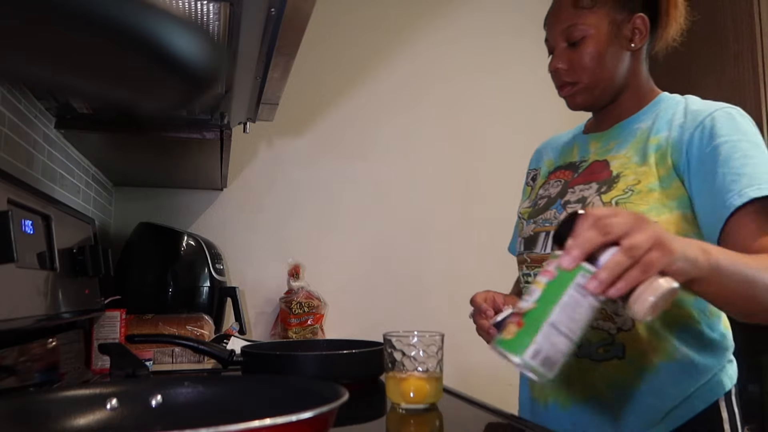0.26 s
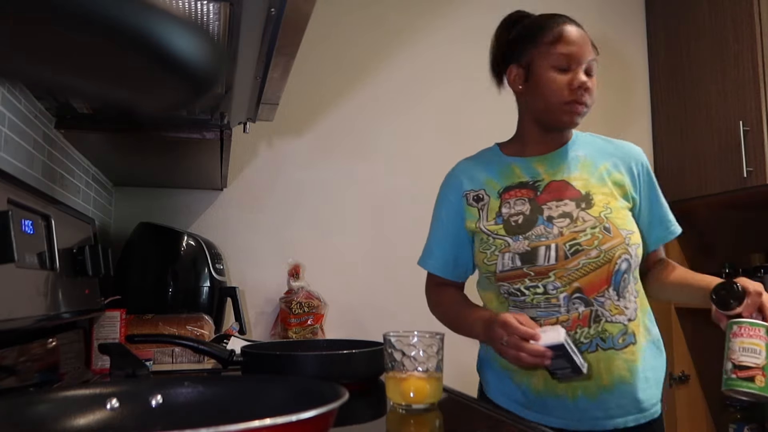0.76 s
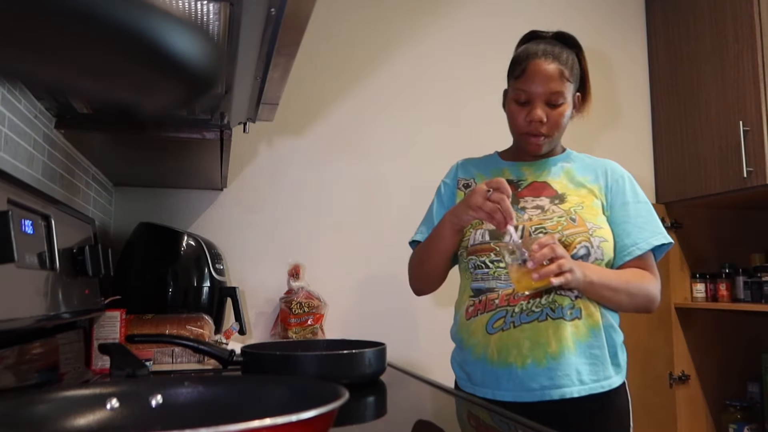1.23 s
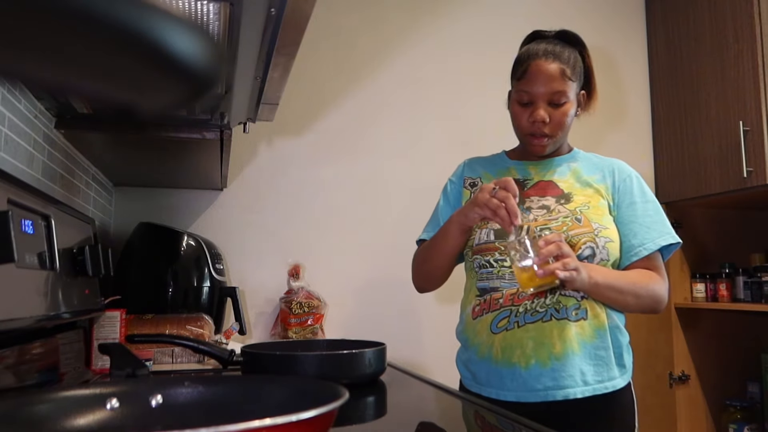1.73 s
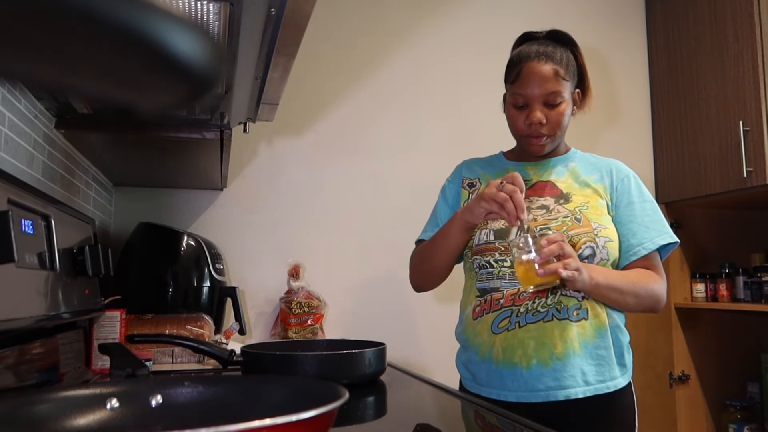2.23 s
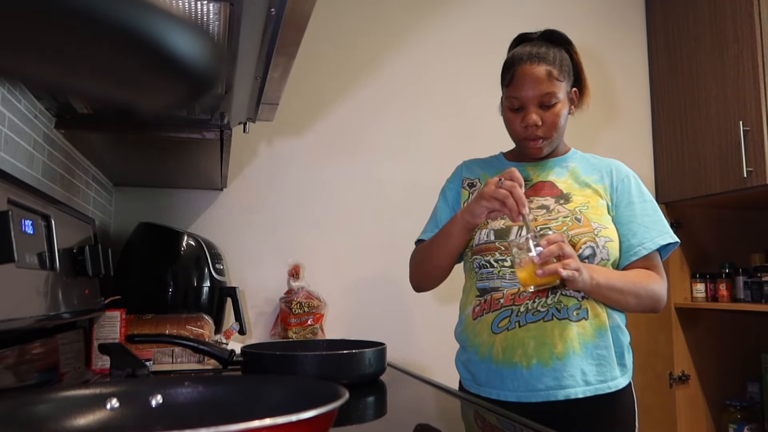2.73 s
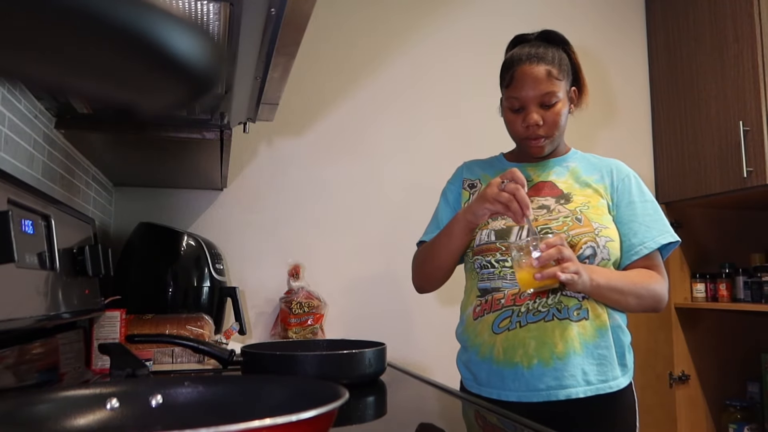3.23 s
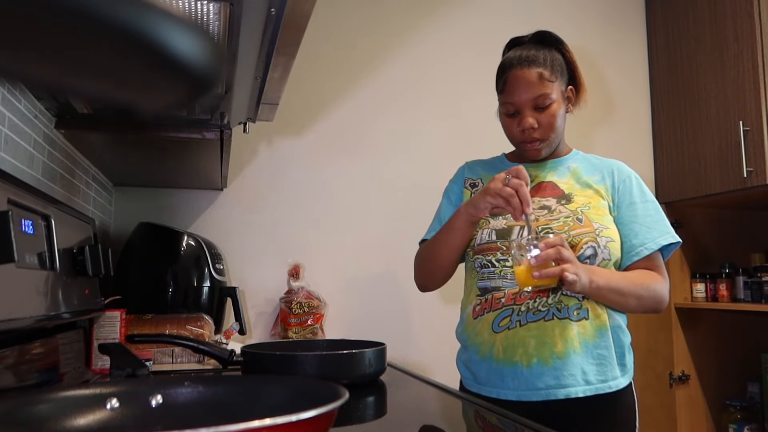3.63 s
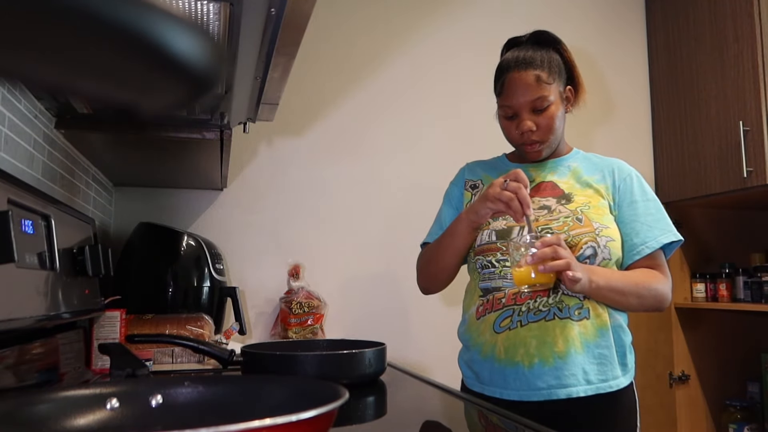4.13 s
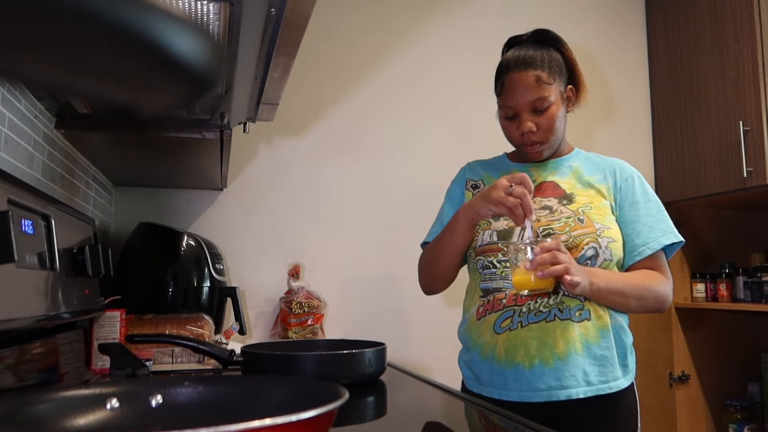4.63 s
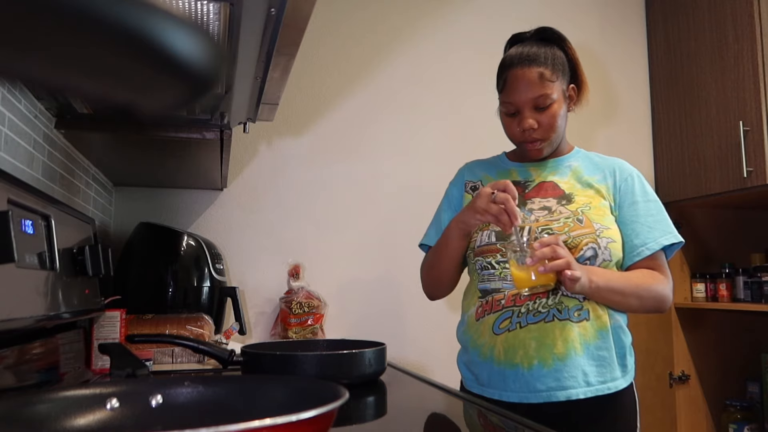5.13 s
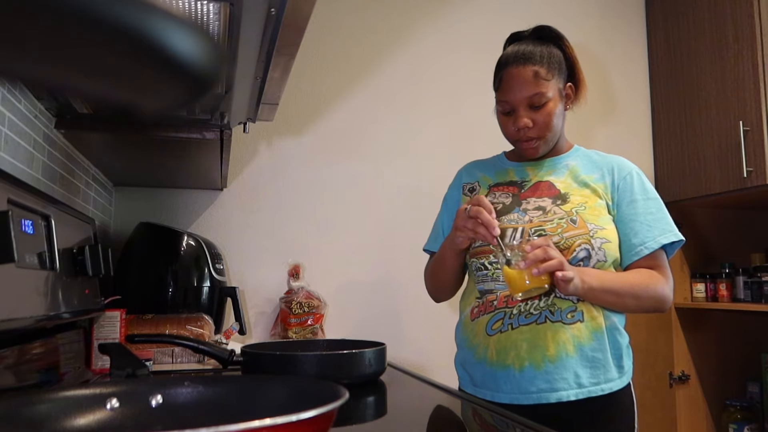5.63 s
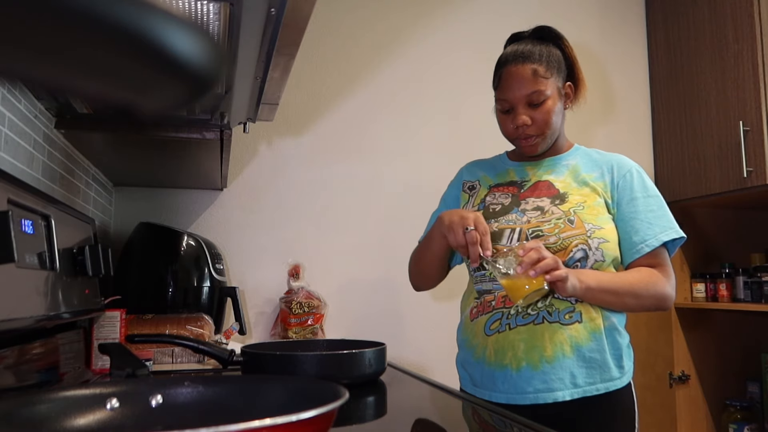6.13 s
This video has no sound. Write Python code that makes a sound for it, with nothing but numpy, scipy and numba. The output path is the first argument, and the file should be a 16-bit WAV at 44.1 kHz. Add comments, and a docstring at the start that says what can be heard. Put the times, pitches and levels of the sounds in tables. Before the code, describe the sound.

After a quiet second of fan hum and faint sizzling, a metal fork rapidly beats eggs in a drinking glass, clinking sharply in a small kitchen.

```python
"""In a small hard kitchen a fork beats eggs in a hand-held drinking glass, beside a sizzling pan and a fan.
The fan is a low hum, whose level dips at times, with filtered noise; the fat is random clicks over hiss.
Noise drives a spice jar's air resonances at the start; later a sudden waveform step is heard as a dull click.
Then the strokes excite damped modes of the glass, over grazing and swishing noise and slops of decaying sines.
All but fan and pan echo in a feedback delay network; a gain control ducks the whole mix after loud clinks."""
import sys
import numpy as np
from scipy import signal
from scipy.fft import rfft, irfft, next_fast_len
from scipy.io import wavfile
from scipy.ndimage import uniform_filter1d
from numba import njit

SR = 44100
rng = np.random.default_rng(int(sys.argv[2]) if len(sys.argv) > 2 else 0)


def wrap_up_sound(samples):
    """Save the sound to the file named by the first command line argument, as 16-bit audio."""
    columns = np.atleast_2d(samples).T
    # keep every value between -1 and 1, then stretch to whole-number steps
    tamed = np.clip(columns, -1, 1)
    steps = np.round(tamed * 32767).astype(np.int16)
    wavfile.write(sys.argv[1], SR, steps)


def how_loud(loudness_db):
    """Turn decibels into a plain amplitude multiplier (0 dB gives 1, 20 dB gives 10)."""
    steps = np.asarray(loudness_db, float) / 20
    return 10 ** steps


N = 280909
T = np.arange(N) / SR
M = next_fast_len(N)  # transform length
F = np.fft.rfftfreq(M, 1 / SR)

# damped modes of the hand-held glass: ring number (0 low, 1 second, 2 third, 3 top), f/Hz, level/dB, t60/s
GLASS_MODES = [(0, 1496, -9, 0.017), (0, 1780, -7, 0.038), (0, 1809, -0.4, 0.062), (0, 1872, -2, 0.04),
               (0, 2037, -10, 0.032), (0, 2358, -6.5, 0.023), (1, 2923, 1.5, 0.031), (1, 3057, 2.5, 0.031),
               (1, 3293, 2, 0.044), (1, 3436, -10.5, 0.062), (2, 4330, -11.5, 0.037), (2, 4576, -5, 0.053),
               (2, 4645, -4, 0.06), (2, 4756, -3.5, 0.041), (2, 5556, -8, 0.039), (3, 8250, -8.5, 0.04),
               (3, 8550, -7.5, 0.027), (3, 7200, -25, 0.026)]


def level(x, db):
    """Root-mean-square normalisation: scale a signal to a given rms level."""
    return x * how_loud(db) / np.sqrt(np.mean(x ** 2))


def colour(x, points):
    """Spectral shaping: filter by a (f/Hz, level/dB) outline, interpolated over log frequency."""
    hz, db = np.transpose(points)
    gain = how_loud(np.interp(np.log(np.maximum(F, 1)), np.log(hz), db))
    return irfft(rfft(x, M) * gain, M)[:N]


def band(x, lo_hz, hi_hz):
    """Band limitation: a Butterworth band-pass."""
    return signal.sosfilt(signal.butter(2, [lo_hz, hi_hz], "bandpass", fs=SR, output="sos"), x)


def ring(x, hz, t60):
    """Damped resonance: a unit impulse starts a sine whose envelope decays from 1 by 60 dB in t60."""
    pole = np.exp(2j * np.pi * hz / SR - np.log(1000) / (t60 * SR))
    return signal.lfilter([1], [1, -pole], x).imag


def fade(x, s):
    """Exponential relaxation: give each impulse a tail of time constant s."""
    return signal.lfilter([1], [1, -np.exp(-1 / (s * SR))], x)


def walk(rate):
    """Slow random modulation: normal values held for 1 / rate s, then smoothed twice over that time."""
    k = int(SR / rate)
    held = np.repeat(rng.standard_normal(N // k + 1), k)
    return uniform_filter1d(uniform_filter1d(held, k), k)[:N]


def flicker(rate):
    """Quick random modulation: a walk without its slow drift."""
    w = walk(rate)
    return w - uniform_filter1d(w, size=SR // 6)


def grains(rate, spread_db):
    """Random impulse process: rate clicks per second on average, a few much larger than the rest."""
    struck = rng.random(N) < rate / SR
    return struck * rng.standard_normal(N) * how_loud(spread_db * np.minimum(rng.exponential(size=N), 4.5))


def widen(x, loose, loose_db):
    """Interchannel delay and decorrelation: a small lag and loose noise, high-passed in the side, widen the treble."""
    lag_s, wide_hz = 1.9e-5, 4300
    turn = np.pi * F * lag_s  # half the phase difference in radians
    wide = 1 / np.sqrt(1 + (wide_hz / np.maximum(F, 1)) ** 12)
    sound = rfft(x, M)
    mid = irfft(sound * np.cos(turn), M)[:N]
    unrelated = how_loud(loose_db) * rfft(loose, M)
    side = irfft(wide * (1j * np.sin(turn) * sound + unrelated), M)[:N]
    return np.array([mid + side, mid - side])


def fan():
    """Tonal and turbulent noise: a motor hum at twice the mains rate amid rushing air, nearly alike left and right."""
    # course of the hum, with brief dips: t/s, level/dB (rms of the fundamental before small random changes)
    hum_course = [(0.0, -26), (0.49, -22.5), (1.56, -25), (2.13, -21), (2.55, -23.5), (3.41, -21),
                  (3.53, -23), (4.61, -22), (4.9, -24.5), (5.14, -20.5), (5.23, -28), (5.34, -24),
                  (5.43, -28), (5.66, -23.5), (6.35, -25), (6.37, -28)]
    # spectral outline of the rushing air: f/Hz, relative level/dB per Hz
    air_outline = [(15, -56), (25, -19), (38, -15), (64, -19.5), (87, -14.5), (119, -10), (144, -5.5),
                   (189, -13.5), (425, -21.5), (787, -25.5), (954, -24.5), (1460, -35), (2180, -22.5),
                   (2500, -34.5), (3250, -43), (5500, -120)]
    # outline of the left-right difference, applied on top of the air outline: f/Hz, level/dB
    side_outline = [(30, -31), (90, -31), (200, -25), (380, -15), (700, -20.5), (1300, -26), (2500, -24)]
    hum_hz, second_db, air_db = 119.87, -20.5, -36.5  # air_db: rms of the mid from 213 to 1170 Hz, before its swell
    s, hum_db = np.transpose(hum_course)
    phase = 2 * np.pi * np.cumsum(hum_hz + 0.79 * walk(5.47)) / SR
    harmonics = np.sin(phase) + how_loud(second_db) * np.sin(2 * phase)
    hum = np.sqrt(2) * how_loud(np.interp(T, s, hum_db) + 0.34 * walk(14)) * harmonics
    mid, side = (colour(rng.standard_normal(N), air_outline) for _ in range(2))
    gain = how_loud(air_db) / np.std(band(mid, 213, 1170)) * how_loud(1.2 * walk(2.2))
    return hum + gain * (mid + colour(side, side_outline) * np.array([[1], [-1]]))


def pan():
    """Random bubble bursts: steam in hot fat crackles over hiss; each part of the spectrum flickers on its own."""
    # spectral outline of the sizzle: f/Hz, relative level/dB per Hz
    sizzle_outline = [(710, -31), (1200, -9), (1460, -6.5), (1520, -13.5), (2120, -1.5), (2380, -5.5),
                      (2510, 0), (3980, -2), (6310, -7), (9000, -10.5), (12500, -6), (13900, -7),
                      (15500, -15)]
    # course of the sizzle: t/s, level/dB (before flicker and balance)
    fat_course = [(0, -39), (.9, -37), (1.65, -40), (2.1, -38), (3.3, -37.5), (4.2, -39), (5.0, -38.5),
                  (5.4, -40.5), (6.37, -41)]
    s, fat_db = np.transpose(fat_course)
    near, loose = (colour(level(grains(3000, 2.46), -4.5) + rng.standard_normal(N), sizzle_outline)
                   for _ in range(2))
    scale = how_loud(1.2) / np.std(band(near, 9040, 13840))
    swell = np.interp(T, s, fat_db) + 1.66 * flicker(28)  # dB, common to all bands
    both = widen(scale * near, scale * loose, 0.4) * how_loud([[.3], [-.3]])
    spectrum = rfft(both, M)
    edges_hz = [0, 2500, 4000, 6000, 8500, 11000, 13000, SR]
    out = 0
    for lo, hi in zip(edges_hz, edges_hz[1:]):
        part = irfft(spectrum * ((F >= lo) & (F < hi)), M)[:, :N]
        out = out + part * how_loud(swell + 1.97 * flicker(28))
    return out


def jar():
    """Air resonance: rubbing noise drives the lifted jar's narrow resonances, which swell and fade."""
    # hollow rings of the spice jar: t/s, length/s, f/Hz, level/dB (rms before the swell)
    jar_rings = [(0., 0.087, 765, -36.5), (.04, 0.2, 960, -41), (.1, .05, 830, -41)]
    out = 0
    for s, length, hz, db in jar_rings:
        swell = np.sin(np.pi * np.clip((T - s) / length, 0, 1))
        out = out + swell * level(ring(rng.standard_normal(N), hz, 0.086), db)
    return out


def waveform_step():
    """Step response: a sudden jump in the waveform sinks back and, band-limited, is heard as a dull click."""
    start_s, step_db, decay_s = 1.078, -13, 0.0045  # step_db: height of the step before the band-pass
    step = np.exp(-np.maximum(T - start_s, 0) / decay_s) * (T >= start_s)
    return -how_loud(step_db) * band(step, 60, 1600)


def stirring():
    """Friction and splash excitation: egg swishes unevenly through tines; light grazes keep the glass singing."""
    # stirring effort, before the level of each of its two sounds: t/s, level/dB
    effort = [(1.1, -33.5), (1.98, -37.5), (2.3, -30), (2.64, -37), (3.01, -31.5), (3.56, -36),
              (4.08, -37.5), (4.87, -28.5), (5.33, -34.5), (5.86, -34), (6.06, -30), (6.21, -37),
              (6.37, -38)]
    s, stir_db = np.transpose(effort)
    stir = how_loud(np.interp(T, s, stir_db)) * (T > s[0])
    graze = how_loud(-33.5) * stir * level(grains(900, 1.1), 0)
    sing = sum(how_loud(db) * ring(graze, hz, t60) for _, hz, db, t60 in GLASS_MODES)
    splashes = fade(np.abs(grains(60, 2.5)), 0.012) + .3
    swish = level(band(splashes * rng.standard_normal(N), 1320, 5100), -3.5)
    return sing + stir * swish


def glass():
    """Modal superposition: strokes build over a few ms as tines land; egg and fingers shift each mode a little."""
    # fork strokes: t/s, reference peak level/dB, then level/dB of the low, second and top ring re that peak
    strokes = [(1.1952, 1.5, -3.5, -14, -15), (1.2101, -7, -12, -12, -28), (1.381, -3.5, -4, -19, -24),
               (1.3962, -5, -19, -5, -22), (1.4282, -11, -16, -12, -21), (1.5851, -0.5, -11.5, -14, -29),
               (1.5997, -8, -5, -11, -29), (1.7514, -2, -10.5, -10.5, -19), (1.769, -8.5, -17, -5, -21),
               (1.936, -6, 0.5, -10.5, -33), (1.9484, -15, -4, -7, -30), (2.104, -3, -8.5, -12.5, -25),
               (2.3092, -12.5, -24, -4.5, -24), (2.4632, -15, -27, -3.5, -20), (2.612, -23, 1, -12, -18),
               (2.6496, -17, -21, -10, -19), (2.7776, -11.5, -3, -16, -25), (2.807, -4.5, -7, -15, -29),
               (2.829, -10, -11, -11, -23), (2.9565, -3, -0.5, -16, -30), (3.0136, -6.5, -16, -6, -17),
               (3.3055, -9.5, -3, -19, -29), (3.3295, -12.5, -8, -19, -23), (3.4996, -22.5, 4, -16, -25),
               (3.5304, -12.5, -11, -18, -25), (3.6631, -5.5, 0.5, -21, -32), (3.721, -10.5, -3.5, -9, -29),
               (3.7586, -14.5, -1.5, -17, -25), (3.8525, -22.5, 4.5, -12, -24),
               (3.9654, -11, -22, -8.5, -27), (4.0347, -5, 2, -22, -18), (4.0694, 0.5, -3.5, -20, -6),
               (4.2626, -14, -10, -8.5, -22), (4.3034, -10.5, -17, -8, -28), (4.4004, 0.5, -2, -21, -25),
               (4.4405, -3.5, -4.5, -9.5, -9), (4.5124, -14.5, -9, -3.5, -26), (4.589, -8.5, -4, -16, -30),
               (4.6344, -13.5, -14, -4.5, -25), (4.777, -0.3, 0.5, -11.5, -39),
               (4.9552, -2.5, -1.5, -11.5, -19), (4.9865, -0.5, -7, -15, -8), (5.1694, 2, -7, -14, 4),
               (5.3554, -0.5, -5, -9, 4.5), (5.4181, -18, 0, -6, -20), (5.5258, -2, -4.5, -11.5, 0.5),
               (5.5444, -9, -10, -7, -20), (5.7123, 0.5, -9.5, -28, -9), (5.8915, -1.5, 0.5, -18, 4.5),
               (5.9044, -6, -0.5, -14, -19), (5.9244, -5.5, -6, -7.5, -23), (6.0798, -8.5, 3, 6, -33),
               (6.094, -15, -7, -4, -32), (6.3597, -2.5, -7, -22, -27)]
    # drift of the third ring: t/s, level/dB re the peak, before the share that follows the low ring
    third_ring = [(1.2, 1), (1.4, -3.5), (2.1, -5), (2.35, -11), (2.8, -6.5), (3.7, -4.5), (4.1, -11.5),
                  (4.8, -5.5), (5.5, -6.5), (5.8, -25), (5.92, -4.5), (6.09, -1.5), (6.36, -24)]
    rise_s, detune, third_per_low = 0.0032, 0.0087, 0.43  # detune: largest fraction; third_per_low: dB per dB
    scatter_db = 7  # whole range of the chance in each mode
    crack_db, tick_db = -11, -18  # gains before the band-passes, re the stroke
    ragged_db, ragged_s = 3.5, .004  # scale of the flutter's random draws before smoothing, and their hold time
    ring_no, hz, mode_db, t60 = np.array(GLASS_MODES).T[:, :, None]
    t = np.arange(SR // 12) / SR
    shape = how_loud(mode_db) * (1 - np.exp(-t / rise_s)) * np.exp(-np.log(1000) * t / t60)
    out, ticks = np.zeros(N + len(t)), np.zeros(N)
    chances = rng.random((len(strokes), 3, len(GLASS_MODES), 1))
    for (s, peak, low, second, top), (size, shift, start) in zip(strokes, chances):
        third = np.interp(s, *np.transpose(third_ring)) + third_per_low * low
        rings = np.array([low, second, third, top])
        db = peak + rings[np.round(ring_no).astype(int)] + scatter_db * (size - .5)
        cycles = hz * (1 + detune * (2 * shift - 1)) * t + 0.38 * start
        i = int(s * SR)
        out[i:i + len(t)] += np.sum(how_loud(db) * shape * np.sin(2 * np.pi * cycles), axis=0)
        ticks[i] = how_loud(peak)
    # steel on glass also cracks broadly for a few ms, with a shorter bright tick on top
    crack = band(fade(ticks, 0.014) * rng.standard_normal(N), 1380, 6500)
    tick = band(fade(ticks, 0.0028) * rng.standard_normal(N), 7000, 18000)
    # sloshing egg and rattling tines make every ring flutter
    flutter = how_loud(ragged_db * walk(1 / ragged_s))
    return out[:N] * flutter + how_loud(crack_db) * crack + how_loud(tick_db) * tick


def egg():
    """Damped bubble oscillation: each slop is a ragged cluster of short air pockets scattered round one pitch."""
    # egg folding over and trapping air: t/s, level/dB (before build-up and chance), f/Hz, pitch scatter (0-1)
    slops = [(2.699, -34, 960, 0.18), (3.185, -29.5, 1140, 0.42), (3.531, -28, 1190, 0.38),
             (3.575, -24.5, 1040, .45), (4.109, -28, 1250, 0.13), (4.305, -25, 1040, 0.38),
             (4.95, -32, 945, 0.21), (5.139, -29, 693, 0.02), (5.549, -32, 1100, .4),
             (5.584, -30, 1000, .3), (5.622, -30.5, 960, .3), (5.719, -34, 860, 0.27), (5.9, -27, 880, 0.1),
             (5.934, -29, 865, 0.13), (5.972, -36, 840, 0.09), (6.088, -24.5, 905, 0.04),
             (6.125, -40, 880, 0.1)]
    spread_s, decay_s, rise_s = .025, 0.0081, 0.00048
    out, t = np.zeros(N + SR), np.arange(SR // 10) / SR
    envelope = np.exp(-t / decay_s) * (1 - np.exp(-t / rise_s))
    for (s, db, hz, scatter), chance in zip(slops, rng.random((len(slops), 8, 3))):
        for lag, detune, size in chance:
            f = hz * (1 + scatter * (2 * detune - 1))
            i = int((s + spread_s * lag) * SR)
            out[i:i + len(t)] += how_loud(db - 4.2 * size) * np.sin(2 * np.pi * f * t) * envelope
    return out[:N]


@njit
def walls(x, lags, gain, damp):
    """Multiple reflection: eight delay lines feed each other, duller on every round."""
    line, soft, out = np.zeros((8, 4096)), np.zeros(8), np.zeros((2, len(x)))
    for i in range(len(x)):
        total = 0.
        for k in range(8):
            soft[k] += (1 - damp) * (gain[k] * line[k, (i - lags[k]) & 4095] - soft[k])
            total += soft[k]
            out[k % 2, i] += soft[k]
        for k in range(8):
            line[k, i & 4095] = x[i] + soft[k] - total / 4
    return out


def room(source):
    """Reverberation: line gains follow from a decay time; returns the left and right echo."""
    t60_s, damp, room_db = .4, 0.42, -12.5  # t60_s: before damp shortens the decay, most in the treble
    lags = np.array([331, 457, 613, 787, 941, 1153, 1327, 1549])  # samples
    gain = how_loud(-60 * lags / SR / t60_s)
    return how_loud(room_db) * walls(source + 1e-18, lags, gain, damp)


def scene():
    """Linear superposition: jar, step, fork, glass and egg with their room echo, over fan and pan."""
    steady = fan() + pan()
    direct = jar() + waveform_step() + stirring() + glass() + egg()
    left, right = room(direct)
    apart = (left - right) / 2
    # a little of the room's stereo width is added at all pitches
    room_width = how_loud(-13.0) * apart * np.array([[1], [-1]])
    return widen(direct + (left + right) / 2, apart, 1.7) + room_width + steady


@njit
def follow(x, attack, release, start):
    """Asymmetric smoothing: an envelope that rises fast and falls slowly."""
    e, out = start, np.empty(len(x))
    for i in range(len(x)):
        e += (x[i] - e) * (attack if x[i] > e else release)
        out[i] = e
    return out


def roll_off(x):
    """The treble ends steeply here."""
    return signal.sosfilt(signal.butter(12, 15740, fs=SR, output="sos"), x)


def record(dry):
    """Dynamic compression: loud clinks pull the level down, slow to return; peaks clip softly; the top rolls off."""
    attack_s, release_s, threshold, top_hz = .008, .12, 0.41, 14400
    envelope = follow(np.abs(dry).max(axis=0), 1 / (attack_s * SR), 1 / (release_s * SR), .1)
    ducked = dry * np.minimum(1, threshold / envelope) ** 0.36
    clipped = np.tanh(1.131 * ducked) / 1.114
    mix = signal.sosfilt(signal.cheby1(10, .3, top_hz, fs=SR, output="sos"), clipped)
    return roll_off(mix)


dry = scene()
out = record(dry)
wrap_up_sound(out)
```